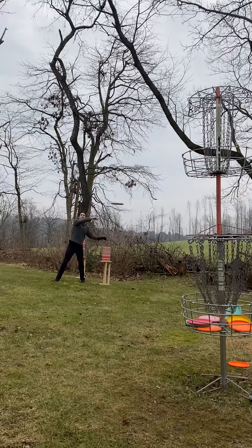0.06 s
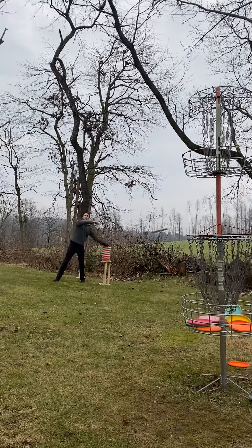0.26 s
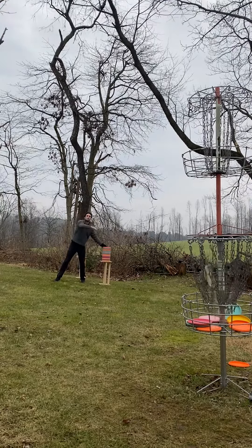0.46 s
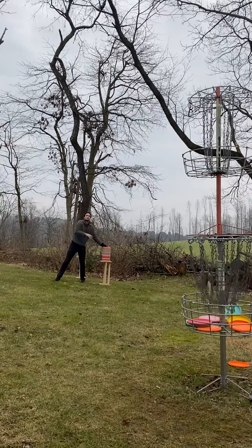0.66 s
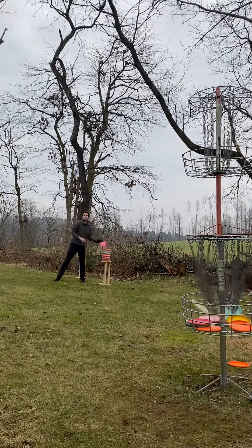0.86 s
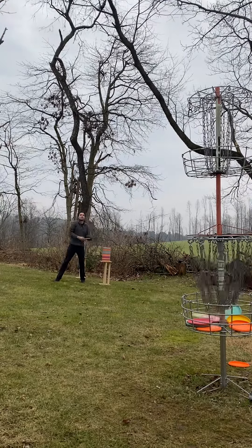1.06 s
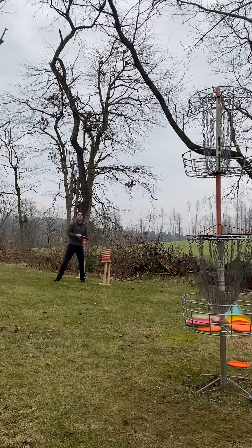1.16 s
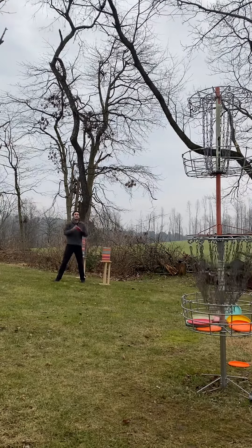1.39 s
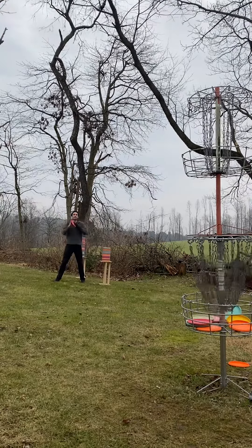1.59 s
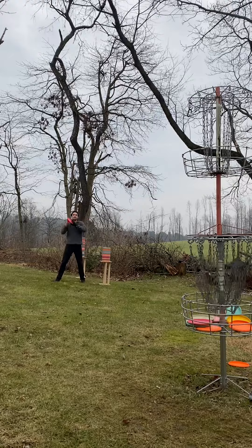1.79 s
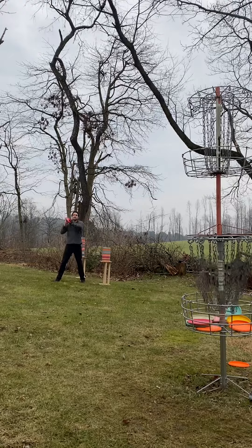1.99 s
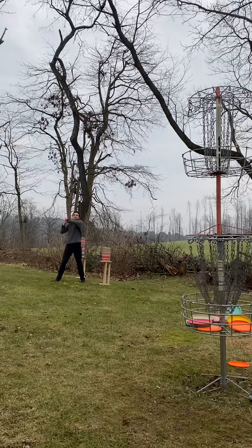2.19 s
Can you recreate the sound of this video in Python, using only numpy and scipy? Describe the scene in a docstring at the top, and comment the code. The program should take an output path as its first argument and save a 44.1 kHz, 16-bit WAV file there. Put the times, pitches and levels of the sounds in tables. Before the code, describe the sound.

A disc crashes into a disc golf basket's steel chains, which jingle and slowly settle.

```python
"""Distant traffic rumbles behind an open lawn; a disc golf basket stands close to two microphone ports.
At 0.4 s a plastic disc flies into the chains: a hollow thud and a crash of steel links.
The chains slap back against the pole and clang on the rods, each slap a shower of tiny contacts.
At 1.1 s the disc drops into the tray with a clack. The links jingle on as they swing out,
ever sparser, with now and then the clear ping of one link hanging free."""
import sys
import numpy as np
from scipy import signal
from scipy.fft import rfft, irfft, next_fast_len
from scipy.io import wavfile
from scipy.ndimage import map_coordinates

SR = 44100
rng = np.random.default_rng(int(sys.argv[2]) if len(sys.argv) > 2 else 0)


def bounce(signal):
    """Save signal as a 16-bit WAV file at the path given by the first command-line argument."""
    frames = np.transpose(np.atleast_2d(signal))
    limited = np.clip(frames, -1, 1)
    pcm = np.round(limited * 32767).astype(np.int16)
    wavfile.write(sys.argv[1], SR, pcm)


N = 99225  # 2.25 s

# tone of the traffic's rumble, of its tyres, and the treble the air takes from them (f/Hz, level/dB)
RUMBLE_EQ = [(12, -25), (30, -70), (50, 1.5), (65, 2), (80, 7.5), (95, 5.5), (120, -10.5), (155, -10),
             (200, -20), (400, -75)]
TYRE_EQ = [(100, 5), (200, -2.5), (350, -2.5), (500, -4.5), (700, 2), (1000, 2), (1400, -3), (2000, -11.5),
           (3000, -19.5), (4500, -29.5), (8000, -23)]
AIR_EQ = [(3000, 0), (6000, -8), (12000, -30)]
# stereo width of the tyre wash (f/Hz, left-right likeness; below 0 counts as 0)
TYRE_LIKENESS = [(60, 0.85), (180, 0.99), (550, 0.32), (1650, 0.76), (4970, -0.35), (15000, -0.4)]
# the basket at the left port against the right: phase lead (f/Hz, lead/rad), balance (f/Hz, level/dB)
PORT_LEAD = [(350, 0), (650, .7), (1400, -.15), (2100, 0), (2750, 1.9), (3600, .6), (5500, .6), (6300, 2.5),
             (7100, 3.1), (7600, 3.2), (9600, 6.2), (11000, 6.3), (13200, 9.4), (14400, 9.5), (15500, 11.5)]
PORT_BALANCE = [(200, -1), (550, -4.5), (1200, 5.5), (1900, -1.5), (15000, 0.5)]

# the disc bumping chains and tray, then landing on the discs in the tray (t/s, level/dB, fade/s)
DISC_BUMPS = [(.399, -27.5, 0.025), (.417, -34.5, 0.039), (.451, -28.5, 0.012), (.499, -37.5, 0.079),
              (.615, -35.5, 0.0079), (.812, -45, 0.015), (.845, -38, 0.012), (1.034, -38.5, 0.0025)]
DISC_LANDINGS = [(1.096, -31.5, 0.00076), (1.1305, -27, 0.0042)]
# tone of a bump and of a landing (f/Hz, level/dB)
BUMP_EQ = [(80, -41), (170, -6.5), (280, -4), (400, -1.5), (545, 4), (750, -4), (1020, 3.5), (1230, -7),
           (1460, -4), (1900, 1), (2600, -17), (6000, -18)]
LANDING_EQ = [(200, -11), (500, 1), (1200, -5), (1600, -1), (2200, -8), (3800, -10), (6000, 0),
              (11000, -15), (15000, -45)]
# the disc's hollow bowl meeting chains, pole and tray (t/s, level/dB, f/Hz, t60/s)
BOWL_KNOCKS = [(.399, -20.5, 620, 0.031), (.449, -24, 544, 0.056), (1.1305, -21.5, 1644, 0.017)]
# the bowl's partials (pitch ratio, level/dB)
BOWL_PARTIALS = [(1.002, 1.5), (1.3, -7)]

# chains driven into the frame, a link tapping the pole, a chain hitting the wire tray (t/s, level/dB)
FRAME_CRASHES = [(.4, -29), (.417, -34)]
POLE_CHINKS = [(.63, -30), (.712, -32)]
TRAY_CLANKS = [(1.705, -37)]
# the ring of each of these hits (f/Hz, level/dB, t60/s)
FRAME_MODES = [(1029, 2, 0.12), (1443, 1, .06), (1870, -3.5, .1), (2114, -7.5, 0.09), (3610, -4, 0.082),
               (3811, -4, 0.15), (4570, -5, .16), (5130, -19, .16), (5480, -12, 0.17)]
POLE_MODES = [(5370, -1.5, 0.058), (5200, 1, .06)]
TRAY_MODES = [(2180, -11.5, 0.11), (3380, -4, 0.031), (4950, -11.5, 0.27), (5200, -13, 0.1), (8580, 1, 0.2),
              (11800, -1, 0.081), (12500, -9, 0.062)]
# chains striking the steel rods (t/s, level/dB, f/Hz, t60/s)
ROD_CLANGS = [(.4998, -18.5, 2889, 0.07), (.574, -21.5, 2840, .09), (.619, -28.5, 2772, 0.11),
              (.69, -43.5, 2882, 1), (.849, -35, 2885, .1), (1.0, -44, 2890, 0.24),
              (2.014, -53, 2870, 0.14)]
# a rod's partials (pitch ratio, level/dB)
ROD_PARTIALS = [(0.999, 5), (1.01, -25), (1.891, -18)]

# the ring of a free, a light and a heavy link (f/Hz, level/dB, t60/s)
FREE_MODES = [(4990, -4.5, 0.22), (6540, -1, 0.14), (8810, -6, 0.12), (10860, 2, 0.27), (11500, -8, .18),
              (12300, 11, 0.098)]
LIGHT_MODES = [(4986, -19, 0.12), (6775, -8.5, 0.046), (8887, -11, 0.076), (11330, -6, 0.091),
               (12410, -2, 0.033), (12500, 6, 0.053)]
HEAVY_MODES = [(2882, -7.5, 0.3), (5450, -15, 0.29), (7950, 6.5, 0.068), (10360, 4.5, 0.037),
               (11100, -43, 0.13), (13040, 1, 0.11), (14950, -17, 0.038)]
# one link swinging free after a hit (t/s, level/dB)
FREE_PINGS = [(.59, -26.5), (1.3005, -37), (1.4282, -41.5), (1.6851, -40), (1.7056, -37), (2.1595, -43)]
# envelope of the light links' restless rattle (t/s, level/dB)
RATTLE_ENVELOPE = [(0, -60), (.12, -62), (.3, -87), (.396, -63.5), (.405, -24), (.59, -25.5), (.68, -36.5),
                   (.82, -28.5), (.95, -39), (1.3, -41), (1.38, -44.5), (1.5, -38.5), (1.62, -48.5),
                   (1.72, -42.5), (1.8, -51), (2.25, -55.5)]
# light chains swinging together (t/s, level/dB, fade/s)
LIGHT_FLURRIES = [(.048, -41.5, 0.003), (.185, -59, 0.0029), (.716, -37, 0.012), (.776, -32, .008),
                  (.786, -25, 0.061), (.966, -56, 0.012), (1.036, -38, 0.014), (1.05, -29.5, 0.012),
                  (1.072, -43, 0.0056), (1.211, -34, 0.037), (1.285, -36.5, 0.067), (1.41, -34.5, 0.025),
                  (1.436, -34, 0.02), (1.526, -31, 0.026), (1.619, -51, 0.0018), (1.654, -39, 0.02),
                  (1.684, -36, 0.011), (1.704, -30, 0.025), (1.828, -37, 0.0019), (1.875, -38, 0.003),
                  (2.14, -46.5, 0.01), (2.22, -38.5, 0.0045)]
# tone of a pinched link's tick; a sheen near 14 kHz over the jingle, and the treble falling away steeply above
# (f/Hz, level/dB)
TICK_EQ = [(1000, -30), (2500, -5.5), (4100, -9.5), (5000, 0.5), (8500, -3.5), (9800, -0.5), (11500, -2),
           (13600, 12.5), (14100, -35), (15800, -35)]
JINGLE_EQ = [(13600, 1.5), (14050, 11), (14600, 5), (15200, -26)]
# heavy chains slapping disc and pole (t/s, clash level/dB, ring level/dB, fade/s)
HEAVY_SLAPS = [(.399, -17.5, -27, 0.077), (.443, -40, -25, 0.054), (.499, -21, -17, 0.026),
               (0.534, -25.5, -19.5, 0.044), (.561, -14, -26, 0.013), (0.574, -49, -22, 0.012),
               (0.615, -21, -20.5, 0.029), (0.734, -37.5, -30.5, 0.031), (0.802, -35.5, -38, 0.065),
               (0.848, -22.5, -19.5, 0.016), (.925, -35.5, -39, 0.022), (1.045, -40, -33.5, 0.054),
               (2.01, -43.5, -48, 0.034)]
# single hard snaps of steel on steel (t/s, level/dB)
STEEL_SNAPS = [(.5085, 10.5), (.7562, 5.5)]
# tone of a clash and of a snap (f/Hz, level/dB)
CLASH_EQ = [(200, -19), (900, -13), (2000, -4.5), (3300, 6.5), (4200, -4), (5500, 9), (7000, -1), (9000, 4),
            (11500, 6.5), (12700, 18.5), (13600, 12.5), (14200, -30), (15800, -15)]
SNAP_EQ = [(2000, -14), (6000, -17), (9000, -27), (12500, 29.5), (14000, 5), (15800, 16)]

CLASH_PER_S, RING_PER_S, JINGLE_PER_S, BUMP_PER_S = 1400, 600, 330, 680  # contact rates
LEFT_RIGHT = np.array([[.5], [-.5]])  # half up on the left, half down on the right


def amp(db):
    """Decibels to gain."""
    return 10 ** (np.asarray(db) / 20)


def unit_rms(x):
    """Scale to rms 1."""
    return x / np.sqrt(np.mean(x ** 2) + 1e-20)


def decay(t, t60):
    """An envelope that falls 60 dB in t60 seconds."""
    return np.exp(-np.log(1000) * t / t60)


def curve(points, hz):
    """Read (f/Hz, value) points on a log frequency axis."""
    f, value = np.transpose(points)
    return np.interp(np.log(hz + 1), np.log(f + 1), value)


def filtered(x, response):
    """Shape x with a gain that depends on frequency."""
    n = x.shape[-1]
    padded = next_fast_len(n + 4096)
    return irfft(rfft(x, padded) * response(np.fft.rfftfreq(padded, 1 / SR)), padded)[..., :n]


def noise(eq, size):
    """Coloured noise of rms 1."""
    return unit_rms(filtered(rng.standard_normal(size), lambda hz: amp(curve(eq, hz))))


def click(eq, t60):
    """One unpitched contact, of unit energy."""
    t = np.arange(SR // 16) / SR
    burst = noise(eq, len(t)) * decay(t, t60)
    return burst / np.linalg.norm(burst)


def ringing(modes):
    """The decaying partials of a struck body."""
    t = np.arange(SR // 2) / SR
    return sum(amp(db) * decay(t, t60) * np.sin(2 * np.pi * hz * t) for hz, db, t60 in modes)


def soften(body, rise_s):
    """Round off the attack: the ring builds as the contact spreads."""
    return body * (1 - np.exp(-np.arange(len(body)) / SR / rise_s))


def chatter(body, depth=0.51, changes_per_s=170):
    """A ring roughened by the chain that keeps brushing it."""
    knots = rng.standard_normal(1024)
    waver = map_coordinates(knots, [np.arange(len(body)) * changes_per_s / SR], mode="wrap")
    return body * (1 + depth * waver) / np.hypot(1, depth)


def contacts(rate, count, scatter_db=2):
    """Irregular contact times from zero on, with uneven sizes that give the train unit power."""
    gaps = rng.gamma(2, .5, count) / rate
    sizes = unit_rms(amp(scatter_db * rng.standard_normal(count))) * np.sqrt(SR / rate)
    return np.cumsum(gaps) - gaps[0], sizes


def showers(rows, rate):
    """Each (t/s, level/dB, fade/s) opens with a full contact and trails off in weaker ones."""
    hits = []
    for start, db, fade in rows:
        t, sizes = contacts(rate, count=288)
        sizes[0] = np.sqrt(SR / rate)
        hits.append([start + t, amp(db) * sizes * np.exp(-t / fade)])
    return np.hstack(hits)


def strike(hits, bodies, pan_db=2):
    """Deal (times, sizes) among bodies panned from right to left; a lone body sits slightly right."""
    times, sizes = hits
    onsets = np.round(times * SR).astype(int)
    struck = rng.integers(len(bodies), size=len(onsets))
    places = unit_rms(np.linspace(-1, 1, len(bodies)))
    out = np.zeros((2, N))
    for k, (body, place) in enumerate(zip(bodies, places)):
        mine = (struck == k) & (onsets >= 0) & (onsets < N)
        impulses = np.bincount(onsets[mine], sizes[mine], N)
        out += amp(pan_db * place * LEFT_RIGHT) * signal.oaconvolve(impulses, body)[:N]
    return out


def blows(rows, body):
    """One blow on the body for each (t/s, level/dB)."""
    times, db = np.transpose(rows)
    return strike((times, amp(db)), [body])


def tuned_blows(rows, partials, rise_s):
    """One blow for each (t/s, level/dB, f/Hz, t60/s), ringing at its own pitch."""
    out = np.zeros((2, N))
    for start, db, hz, t60 in rows:
        ring = ringing([(ratio * hz, level, t60) for ratio, level in partials])
        out += blows([(start, db)], soften(ring, rise_s))
    return out


def traffic(rumble_db=-38.5, tyres_db=-43):
    """The bed: a mono rumble under a wider wash of far tyres, dulled by the air."""
    def air_and_width(hz):
        angle = np.arccos(np.clip(curve(TYRE_LIKENESS, hz), 0, 1)) / 2
        return amp(curve(AIR_EQ, hz)) * np.array([np.cos(angle), np.sin(angle)])

    mid, side = filtered(noise(TYRE_EQ, (2, N)), air_and_width)
    tyres = unit_rms(np.array([mid + side, mid - side]))
    return amp(rumble_db) * noise(RUMBLE_EQ, N) + amp(tyres_db) * tyres


def lawn_scatter(x, wet_db=-22, t60=0.4):
    """A faint, short tail thrown back by ground and trees."""
    t = np.arange(SR // 2) / SR
    tail = rng.standard_normal((2, len(t))) * decay(t, t60)
    tail /= np.linalg.norm(tail[0])
    return amp(wet_db) * signal.fftconvolve(x[None], tail, axes=1)[:, :N]


def disc_thuds():
    """Dull plastic thuds in the chains, then a clack on the discs in the tray."""
    bumps = strike(showers(DISC_BUMPS, BUMP_PER_S), [click(BUMP_EQ, t60=0.017) for _ in range(6)])
    landings = showers(DISC_LANDINGS, BUMP_PER_S)
    return bumps + strike(landings, [click(LANDING_EQ, t60=0.013) for _ in range(3)])


def hollow_knocks():
    """The disc's bowl sounds a low note when its face hits, a high clack when its rim lands."""
    return tuned_blows(BOWL_KNOCKS, BOWL_PARTIALS, rise_s=0.0019)


def steelwork():
    """Frame, pole, rods and the wires of the tray each ring when a chain hits them."""
    frame = blows(FRAME_CRASHES, ringing(FRAME_MODES))
    pole = blows(POLE_CHINKS, soften(ringing(POLE_MODES), rise_s=0.0017))
    rods = chatter(tuned_blows(ROD_CLANGS, ROD_PARTIALS, rise_s=0.0021).mean(0))
    tray = blows(TRAY_CLANKS, ringing(TRAY_MODES))
    return frame + pole + rods + tray


def free_links():
    """A link hanging free of its neighbours pings out, each mode wavering in its own way."""
    out = np.zeros((2, N))
    for ping in FREE_PINGS:
        ring = sum(chatter(ringing([mode])) for mode in FREE_MODES)
        out += blows([ping], soften(ring, rise_s=.001))
    return out


def link(modes, spread, top_spread=0.0117, top_hz=12000, scatter_db=8):
    """One link's ring, of unit energy, detuned from its neighbours most in its top modes."""
    hz, db, t60 = np.transpose(modes)[:, :, None]
    t = np.arange(SR // 4) / SR
    detune, level, polarity = rng.standard_normal((3, len(modes), 1))
    hz = hz * (1 + detune * np.where(hz > top_hz, top_spread, spread))
    gain = np.sign(polarity) * amp(db + scatter_db * level) / np.sqrt(t60)
    ring = (gain * decay(t, t60) * np.sin(2 * np.pi * hz * t)).sum(0)
    return ring / np.linalg.norm(ring)


def pinched_tick(level_db=-9, t60=0.1, count=24):
    """Weak rings at chance pitches, where a link is pinched by its neighbours."""
    t = np.arange(SR // 4) / SR
    hz = rng.uniform(TICK_EQ[0][0], TICK_EQ[-1][0], (count, 1))
    tick = (amp(curve(TICK_EQ, hz)) * np.sin(2 * np.pi * hz * t)).sum(0) * decay(t, t60)
    return amp(level_db) * tick / np.linalg.norm(tick)


def light_chains(busy_db=-30, thinning=0.6):
    """Light links chink throughout, more sparsely as they settle, in flurries when two strands meet."""
    t, sizes = contacts(JINGLE_PER_S, count=1280)
    level_db = np.interp(t, *np.transpose(RATTLE_ENVELOPE))
    density = np.minimum(1, amp(thinning * (level_db - busy_db)))  # contacts thin out below busy_db
    touching = rng.random(len(t)) < density
    rattle = [t, touching * sizes * amp(level_db) / np.sqrt(density)]
    links = [soften(link(LIGHT_MODES, spread=0.0051) + pinched_tick(), rise_s=0.0001) for _ in range(24)]
    flurries = showers(LIGHT_FLURRIES, JINGLE_PER_S)
    jingle = strike(np.hstack([rattle, flurries]), links)
    return filtered(jingle, lambda hz: amp(curve(JINGLE_EQ, hz)))


def heavy_chains():
    """The crash: each slap is a shower of hard clicks and ringing heavy links; two snaps cut through."""
    starts, clash_db, ring_db, fades = np.transpose(HEAVY_SLAPS)
    clash_hits = showers(zip(starts, clash_db, fades), CLASH_PER_S)
    clash = strike(clash_hits, [click(CLASH_EQ, t60=0.045) for _ in range(8)])
    ring_hits = showers(zip(starts, ring_db, fades), RING_PER_S)
    ring = strike(ring_hits, [link(HEAVY_MODES, spread=0.01075) for _ in range(14)])
    return clash + ring + blows(STEEL_SNAPS, click(SNAP_EQ, t60=0.018))


def port_response(hz):
    """The close basket reaches each port with its own level and phase."""
    gain = amp(LEFT_RIGHT * curve(PORT_BALANCE, hz))
    return gain * np.exp(1j * LEFT_RIGHT * curve(PORT_LEAD, hz))


def scene():
    """The mix: the basket up front, its scatter off the lawn, traffic behind."""
    basket = heavy_chains() + steelwork() + light_chains() + free_links() + disc_thuds() + hollow_knocks()
    return filtered(basket, port_response) + lawn_scatter(basket.mean(0)) + traffic()


def record(dry, cutoff_hz=15750):
    """A brick-wall low-pass trims the very top."""
    return filtered(dry, lambda hz: 1 / (1 + (hz / cutoff_hz) ** 200))


dry = scene()
out = record(dry)
bounce(out)
```